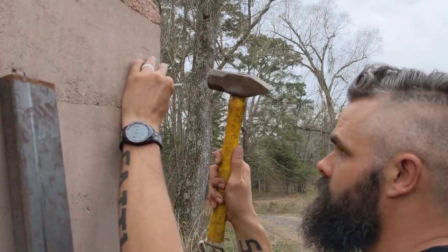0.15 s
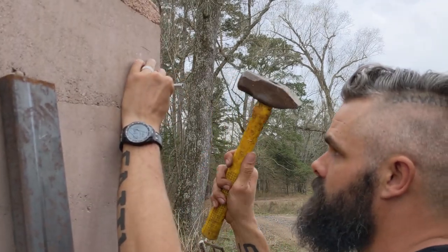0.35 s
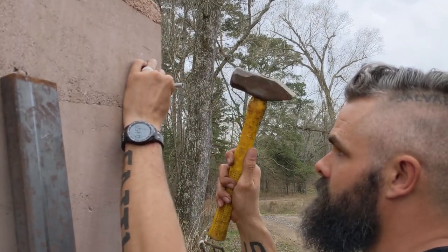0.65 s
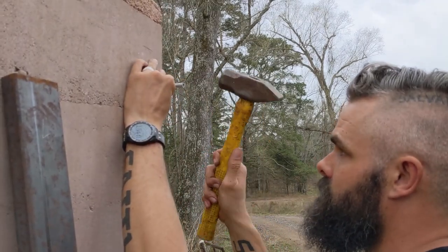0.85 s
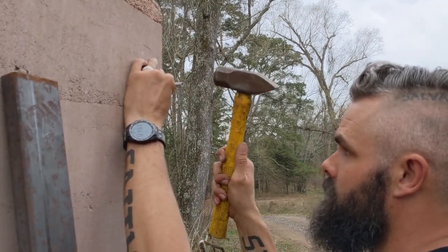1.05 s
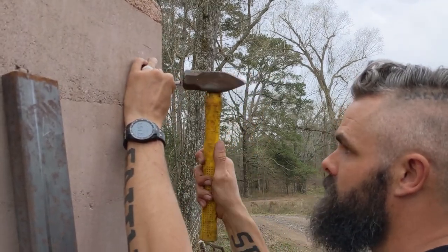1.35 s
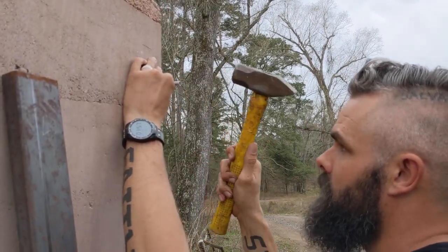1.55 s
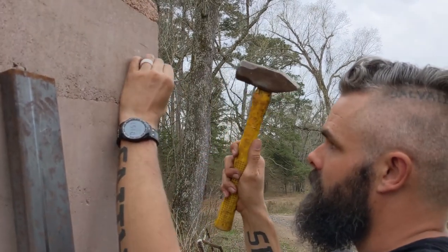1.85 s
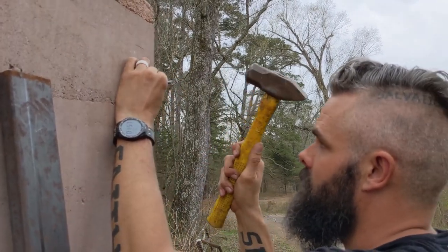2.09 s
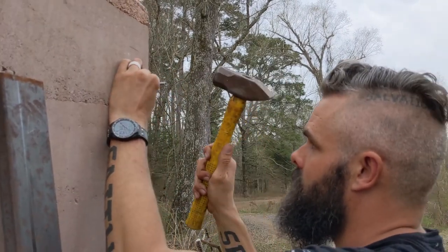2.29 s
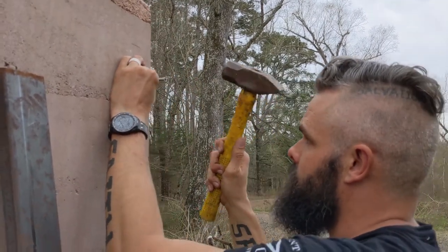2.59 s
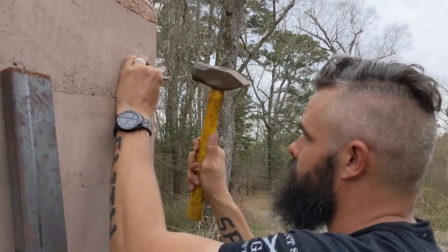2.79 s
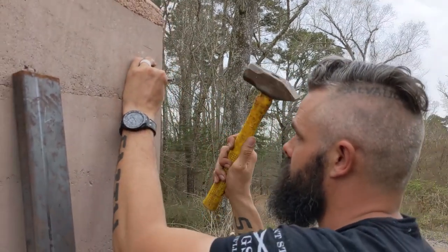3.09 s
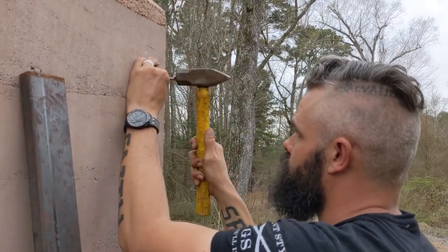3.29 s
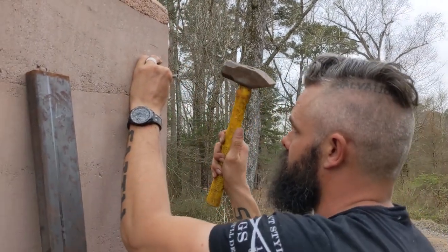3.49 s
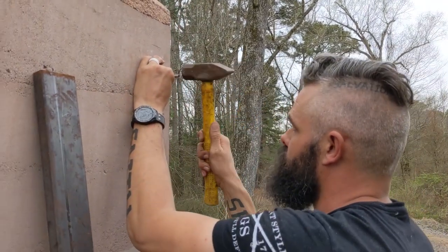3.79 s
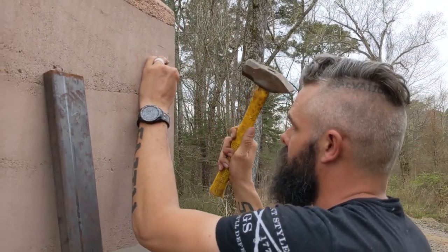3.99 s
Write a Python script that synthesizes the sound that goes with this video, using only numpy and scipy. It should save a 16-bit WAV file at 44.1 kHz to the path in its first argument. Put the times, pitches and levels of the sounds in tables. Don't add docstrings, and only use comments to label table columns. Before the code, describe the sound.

A heavy hammer cracks on a steel anchor in an earth wall outdoors, four blows, a pause, four more, with distant birds.

```python
import sys
import numpy as np
from scipy import signal
from scipy.io import wavfile
from scipy.ndimage import uniform_filter1d

SR = 44100
rng = np.random.default_rng(int(sys.argv[2]) if len(sys.argv) > 2 else 0)


def dump(signal):
    limited = np.clip(np.atleast_2d(signal).T, -1, 1)
    pcm = np.round(limited * 32767).astype(np.int16)
    wavfile.write(sys.argv[1], SR, pcm)


def gain_from_db(level_db):
    decades = np.asarray(level_db, float) / 20
    return 10 ** decades


N = 182733

# (time [s], level [dB])
BREEZE = [(0.0, -66.5), (0.31, -70), (0.69, -65), (1.71, -69), (2.2, -63.5), (2.34, -63), (2.49, -70),
          (2.97, -65), (3.17, -68), (3.53, -68), (3.91, -68.5), (4.14, -68.5)]
# (middle [s], level [dB])
GUSTS = [(0.32, -74), (0.659, -75), (1.08, -72.5), (1.75, -80.5), (2.16, -78), (2.95, -72.5), (3.56, -68),
         (3.8, -78)]
# (frequency [Hz], level [dB per Hz])
WOOD = [(190, -32), (330, -13), (1230, -12), (1360, -11), (2100, -17.5), (2390, -18.5), (2770, -24),
        (3100, -23.5), (13200, -34), (16000, -54)]
# (frequency [Hz], likeness [0 to 1])
LIKENESS = [(60, 0.51), (180, 0.42), (550, 0.86), (1650, 0.05), (4970, 0.081), (15000, 0.02)]
# (time [s], first thud [dB], second thud [dB], shaft knock [dB], head ring [dB])
BLOWS = [
    (0.11, -49.5, -42.5, -31, -39),
    (0.564, -33.5, -32, -29, -46.5),
    (1.006, -29.5, -31, -23, -30.5),
    (1.445, -30, -33.5, -28, -27.5),
    (2.458, -35, -37.5, -24, -31),
    (2.921, -37.5, -33, -25, -33),
    (3.372, -32.5, -30, -26, -34.5),
    (3.827, -28.5, -29, -22.5, -43),
]
# (crack below 5 kHz [dB], crack at 13 kHz [dB], crack left over right [dB], thud left over right [dB])
LANDING = [(-7, -10, 1.8, 2.5), (-8, 0.5, -6.5, 4.5), (2, 6.5, -3.5, 4.5), (-10, 1, 3, 2),
           (2.5, 1.3, -2, 8.5), (-3.5, -3.5, 1, -4), (10, 5.5, -4.5, 14.5), (-2.5, 5, 1.5, 10.5)]
LANDING_HZ = [2200, 4000, 7000, 13000]
# (frequency [Hz], level [dB per Hz])
STEEL = [(940, -38), (1600, -10.5), (2060, -15.5), (3600, -4.5), (5580, -2), (6220, -6), (9550, -8.5),
         (12600, 0), (15900, -15.5), (16500, -22.5)]
# (frequency [Hz], level [dB], time to fall 60 dB [s])
SHAFT = [(294.5, -10, 0.084), (699, -5.5, 0.039), (977, 2.5, 0.015), (1246, 6, 0.013)]
HEAD_HZ = [11962, 11925, 6400]
# (level [dB], time to fall 60 dB [s])
HEAD = [(-1, 0.28), (-3, .13), (-8, 0.1)]
# (frequency [Hz], level [dB per Hz])
SCATTER = [(210, -30), (350, -15), (784, -19.5), (1470, -17.5), (4850, -20), (6170, -16.5), (10300, -16),
           (12100, -11.5), (15700, -17.5), (16500, -29)]
# (frequency [Hz], level against the close part [dB], time to fall 60 dB [s])
TREES = [(350, -34, 0.18), (1478, -27.5, 0.64), (3500, -24, 0.6), (7740, -21, 0.71), (16100, -22, .33)]
# (frequency [Hz], time to fall 60 dB [s], level touched at the lip [dB], level touched at the flank [dB])
SLEEVE = [(5150, 0.016, -23, -2), (6450, 0.076, -11, -17), (7960, 0.041, 1.5, -23), (8250, 0.012, -17, 2),
          (10030, 0.019, -1, -24)]
# (time [s], level at the lip [dB], level at the flank [dB])
TOUCHES = [
    (1.7272, -75.5, -71.5),
    (2.002, -48, -75),
    (2.0484, -70, -44),
]
# (start [s], length [s], level [dB], centre [Hz])
RUBS = [
    (1.89, 0.22, -72, 11500),
    (2.06, 0.15, -78, 12190),
    (2.255, 0.094, -66.5, 11800),
]
# (start [s], length [s], level [dB], centre [Hz])
SCUFFS = [
    (1.72, 0.05, -72.5, 9000),
    (1.86, 0.53, -74.5, 7000),
    (4.025, 0.11, -60.5, 8960),
]
# (start [s], length [s], level [dB], centre [Hz])
CRUMBS = [
    (1.85, 0.24, -71.5, 1930),
    (2.94, 0.3, -59.5, 3060),
    (3.39, 0.3, -59, 3500),
    (3.72, 0.23, -72.5, 3820),
    (3.85, 0.15, -71.5, 3500),
]
# (start [s], length [s], level [dB])
RISERS = [
    (2.81, 0.16, -71),
    (3.171, 0.13, -65.5),
    (3.547, 0.17, -68.5),
    (3.923, 0.19, -67.5),
]
# (start [s], length [s], from [Hz], to [Hz], level [dB])
GLIDES = [(2.403, 0.097, 1764, 1828, -69), (2.683, 0.057, 2614, 1528, -72), (2.719, 0.14, 3240, 2860, -82),
          (3.051, 0.038, 2700, 1750, -71), (3.243, 0.119, 2900, 3040, -76.5),
          (3.275, 0.13, 6230, 4560, -81), (3.581, 0.3, 3106, 2150, -59.5), (3.755, 0.04, 4480, 3240, -74.5),
          (3.904, 0.0846, 2730, 3010, -62.5), (4.079, 0.05, 4400, 3360, -70)]
# (start [s], length [s], level [dB], centre [Hz])
RASPS = [
    (3.285, 0.17, -59, 2750),
    (3.55, 0.052, -58, 1840),
    (3.66, 0.32, -59, 2790),
    (4.04, 0.13, -59.5, 2780),
]

PORT_LAG = 4
TOP_HZ = 16300
PORTS_DB, WOOD_DB, WOOD_FOLLOWS = 3.5, -70, 0.24
GUST_DB, GUST_S = -83, 0.17
CRACK_DB = -12.5
REBOUND_DB, REBOUND_S = -7, .0015
DEEP_DB, DEEP_DB_PER_S = -63, 5
STIFFEN_DB_PER_S = 0.93
SLAP_S, SLAP_DB, FIRST_SLAP_DB = 0.043, -37.5, -48
SLAP_BLUR_S = .0012
SCATTER_DB, SCATTER_DB_PER_S = -39, 1.58
DULL_DB, DULL_DB_PER_S = 3.5, -.5
TREE_LINE_S = 0.16
TICK_DB = -11.5
RISE_FROM_HZ, RISE_TO_HZ, RISE_BEND = 1740, 2052, 11
GLIDE_BEND = 1.3
WAVER = .005


def at_hz(points, hz, axis=1):
    points = np.array(points)
    return np.interp(np.log(hz), np.log(points[:, 0]), points[:, axis])


def rms_one(x):
    return x / np.sqrt(np.mean(x ** 2, axis=-1, keepdims=True) + 1e-20)


def band(x, low_hz, high_hz, order=2):
    edges = [low_hz, min(high_hz, SR / 2.2)]
    return signal.sosfilt(signal.butter(order, edges, "band", fs=SR, output="sos"), x)


def half_octaves(from_hz):
    edges = from_hz * 2 ** np.arange(0, 5.7, .5)
    return zip(edges, edges[1:])


def drift(rate, channels=1):
    r = np.exp(-80 * np.pi * rate / SR)
    noise = rng.standard_normal((channels, N // 40 + 2002))
    slow = rms_one(signal.lfilter([1], [1, -2 * r, r * r], noise))[:, 2000:]
    return np.array([np.interp(np.arange(N) / 40, np.arange(len(s)), s) for s in slow])


def ring(clicks, hz, t60):
    r = gain_from_db(-60 / (t60 * SR))
    w = 2 * np.pi * hz / SR
    return signal.lfilter([0, np.sin(w)], [1, -2 * r * np.cos(w), r * r], clicks + 1e-18)


def fade(starts, t60):
    return signal.lfilter([1], [1, -gain_from_db(-60 / (t60 * SR))], starts)


def add(out, s, piece):
    i = round(s * SR)
    out[:, i:i + piece.shape[-1]] += piece[..., :N - i]


def lagged(x):
    return np.array([x, np.pad(x, (PORT_LAG, 0))[:len(x)]])


def lean(left_db):
    return gain_from_db(np.array([[left_db], [-left_db]]) / 2)


def air():
    t = np.arange(N) / SR
    breeze_db = np.interp(t, *np.transpose(BREEZE))
    mid, side, low, *white = rng.standard_normal((7, N))

    ports = np.array([mid + .5 * side, mid - .5 * side])
    wind = rms_one(band(ports, 122, 182) + 0.52 * band(ports, 80, 290))
    wind = wind * gain_from_db(breeze_db + PORTS_DB + 2.8 * drift(36))

    swell = gain_from_db(GUST_DB) + sum(gain_from_db(db) * np.exp(-((t - s) / GUST_S) ** 2) for s, db in GUSTS)
    rumble = rms_one(band(np.array([low, low + side]), 57, 97))
    gusts = rumble * swell * gain_from_db(1.6 * drift(5.1, channels=2))

    hush = 0
    for k, (low_hz, high_hz) in enumerate(half_octaves(330)):
        hz = np.sqrt(low_hz * high_hz)
        alike = np.clip(at_hz(LIKENESS, hz), 0, 1)
        pair = k % 2 * 2
        mid, side = band(np.array(white[pair:pair + 2]), low_hz, high_hz)
        stereo = np.sqrt(1 + alike) * mid + np.sqrt(1 - alike) * side * [[1], [-1]]
        hush = hush + gain_from_db(at_hz(WOOD, hz) + 0.95 * drift(6.1)) * stereo
    hush_db = WOOD_DB + WOOD_FOLLOWS * (breeze_db - breeze_db.mean())
    return wind + gusts + gain_from_db(hush_db) * rms_one(hush)


def crack(colour_db, contact_s, bounce_db):
    t = np.arange(round(.04 * SR)) / SR
    force = 0
    for k in range(5):
        since = t - REBOUND_S * k
        force = force + gain_from_db(bounce_db * k) * (t >= REBOUND_S * k) * np.exp(-np.maximum(since, 0) / contact_s)
    grit = lagged(force * rng.standard_normal(len(t)))
    pitches = np.geomspace(1700, 16000, num=36)
    shape = (len(pitches), 2, 1)
    share = rng.choice([-1, 1], shape) * gain_from_db(1.5 * rng.standard_normal(shape))
    level_db = at_hz(STEEL, pitches) + np.interp(np.log(pitches), np.log(LANDING_HZ), colour_db)
    out = 0
    for hz, db, ports in zip(pitches, level_db, share):
        mode = rms_one(ring(grit, hz, 16.0 / hz + 0.0014))
        out = out + ports * gain_from_db(db) * hz ** 0.71 * mode
    return out / np.sqrt(np.mean(out[:, :176] ** 2))


def thud(from_hz, to_hz, peak_s, left_db):
    t = np.arange(round(.2 * SR)) / SR
    hz = to_hz + (from_hz - to_hz) * np.exp(-t / peak_s)
    swell = (t / peak_s * np.exp(1 - t / peak_s)) ** 2.6
    return lagged(swell * np.sin(2 * np.pi * np.cumsum(hz) / SR)) * lean(left_db)


def struck(modes, length_s, spread_db):
    click = np.zeros(round(length_s * SR))
    click[0] = 1
    out = 0
    for k, (hz, db, t60) in enumerate(modes):
        strength = gain_from_db(db + spread_db * rng.standard_normal())
        out = out + (-1) ** k * strength * ring(click, hz, t60)
    return out


def blows():
    out = np.zeros((2, N))
    head = [(hz, *mode) for hz, mode in zip(HEAD_HZ, HEAD)]
    for k, (blow, landing) in enumerate(zip(BLOWS, LANDING)):
        s, first_db, second_db, knock_db, ring_db = blow
        body_db, face_db, left_db, thud_left_db = landing
        colour_db = [body_db, body_db, 0, face_db]
        hit = crack(colour_db, contact_s=0.00022, bounce_db=REBOUND_DB)
        add(out, s + 0.0007, lean(left_db) * gain_from_db(CRACK_DB) * hit)

        add(out, s, gain_from_db(first_db + 5.5) * thud(240, 160, 0.0086, thud_left_db))
        add(out, s, gain_from_db(second_db - 1.8) * thud(175, 125, 0.018, thud_left_db))
        add(out, s, gain_from_db(DEEP_DB + DEEP_DB_PER_S * s) * thud(115, 80, 0.018, thud_left_db))

        shaft = [(hz, db + STIFFEN_DB_PER_S * (s - 2) * np.log2(hz / 1206), t60) for hz, db, t60 in SHAFT]
        add(out, s + .0007, gain_from_db(knock_db + 3.5) * lagged(struck(shaft, 0.084, spread_db=2.5)))
        head_ring = np.array([struck(head, 0.34, spread_db=5.5) for port in range(2)])
        add(out, s + 0.0024, gain_from_db(ring_db - 7.5) * head_ring)

        slap = band(crack(colour_db, contact_s=SLAP_BLUR_S, bounce_db=-5.5), 1300, 11000)
        add(out, s + SLAP_S, gain_from_db(SLAP_DB if k else FIRST_SLAP_DB) * slap)
    return out


def scatter(near_t60):
    out = 0
    white = rng.standard_normal((2, 2, N))
    grain = gain_from_db(6.4 * drift(100, channels=2))
    late = round(TREE_LINE_S * SR)
    for k, (low, high) in enumerate(half_octaves(350)):
        hz = np.sqrt(low * high)
        starts = np.zeros(N) + 1e-18
        for s, *_ in BLOWS:
            dull_db = (DULL_DB + DULL_DB_PER_S * s) * np.log2(hz / 6000)
            level_db = SCATTER_DB + SCATTER_DB_PER_S * s + at_hz(SCATTER, hz) - dull_db
            starts[round((s + .002) * SR)] = gain_from_db(level_db)
        near = fade(starts, near_t60)
        tree_t60 = at_hz(TREES, hz, axis=2)
        far = fade(starts, tree_t60)
        far[late:] -= .5 * far[:-late] * gain_from_db(-60 * TREE_LINE_S / tree_t60)
        far = uniform_filter1d(far, size=2001)
        out = out + (near * grain + gain_from_db(at_hz(TREES, hz)) * far) * band(white[k % 2], low, high)
    return gain_from_db(23.5) * out


def puffs(rows, width, rough_db, alike, lumpy_db):
    out = np.zeros((2, N))
    lumps = drift(24.3, channels=2)
    size = 15000
    for s, length_s, db, hz in rows:
        rough = gain_from_db(rough_db * np.clip(rng.standard_normal(size), -3, 2.5))
        mid, side = rng.standard_normal((2, size)) * rough
        stereo = np.array([mid + (1 - alike) * side, mid - (1 - alike) * side])
        noise = rms_one(band(stereo, hz / width, hz * width))
        u = np.clip(np.arange(size) / SR / length_s, 0, 1)
        add(out, s, gain_from_db(db) * np.abs(np.sin(np.pi * u ** .45)) ** 1.1 * noise)
    return out * gain_from_db(lumpy_db * lumps)


def fingers():
    out = puffs(RUBS, width=1.17, rough_db=7.0, alike=0.125, lumpy_db=1.5)
    out = out + puffs(SCUFFS, width=2.16, rough_db=7.0, alike=0.13, lumpy_db=2.5)
    out = out + puffs(CRUMBS, width=1.387, rough_db=4.0, alike=0.11, lumpy_db=2.5)
    for s, lip_db, flank_db in TOUCHES:
        modes = [(hz, max(lip_db + lip, flank_db + flank), t60) for hz, t60, lip, flank in SLEEVE]
        add(out, s, struck(modes, 0.11, spread_db=5))
        tick = crack([0, 0, 0, 0], contact_s=.0005, bounce_db=-5)
        add(out, s, gain_from_db(max(lip_db, flank_db) + TICK_DB) * tick)
    return out


def birds():
    song = np.zeros((1, N))
    waver = drift(30)[0]
    notes = [(s, length_s, RISE_FROM_HZ, RISE_TO_HZ, db, RISE_BEND, .6) for s, length_s, db in RISERS]
    notes = notes + [(*row, GLIDE_BEND, 1.2) for row in GLIDES]
    for s, length_s, from_hz, to_hz, db, bend, early in notes:
        u = np.linspace(0, 1, round(length_s * SR))
        glide = to_hz + (from_hz - to_hz) * (1 - u) ** bend
        hz = glide * (1 + WAVER * np.interp(s + u * length_s, np.arange(N) / SR, waver))
        swell = np.abs(np.sin(np.pi * u ** early)) ** 0.54
        add(song, s, gain_from_db(db) * swell * np.sin(2 * np.pi * np.cumsum(hz) / SR))
    rasps = puffs(RASPS, width=1.06, rough_db=2.5, alike=0.25, lumpy_db=1.0)
    calls = song * gain_from_db(6.9 * drift(40, channels=2)) + rasps
    t = np.arange(SR // 2) / SR
    trees = rng.standard_normal((2, len(t))) * gain_from_db(-60 * t / 0.55)
    return calls + gain_from_db(-33) * signal.fftconvolve(calls, trees, axes=1)[:, :N]


def scene():
    hammering = band(blows(), 52, 16000, order=3)
    return air() + hammering + scatter(near_t60=0.079) + fingers() + birds()


def roll_off(x):
    return signal.sosfilt(signal.butter(12, 17150, fs=SR, output="sos"), x)


def record(dry):
    cut = signal.sosfilt(signal.butter(2, 45, "high", fs=SR, output="sos"), dry)
    cut = signal.sosfilt(signal.cheby2(10, 60, TOP_HZ + 800, fs=SR, output="sos"), cut)
    before_s = np.arange(round(.02 * SR))[::-1] / SR
    ahead = rng.standard_normal((2, len(before_s))) * gain_from_db(-43 - 1600 * before_s)
    smear = signal.fftconvolve(cut, ahead, axes=1)[:, -N:]
    return roll_off(np.clip(cut + smear, -1, 1))


dry = scene()
out = record(dry)
dump(out)
```